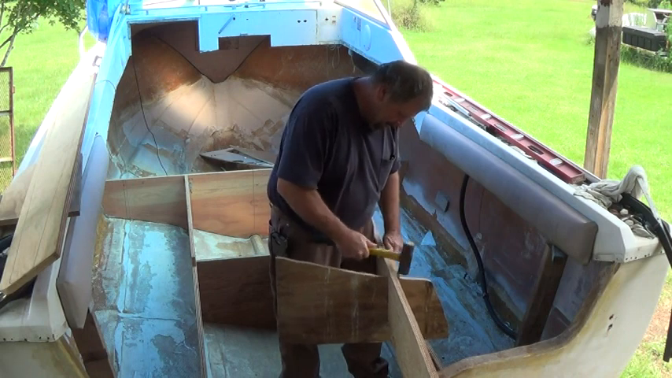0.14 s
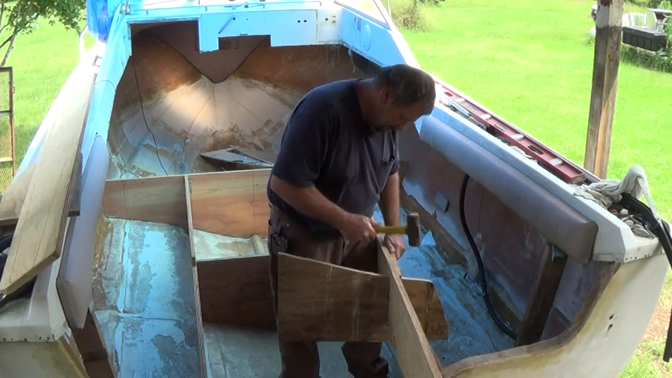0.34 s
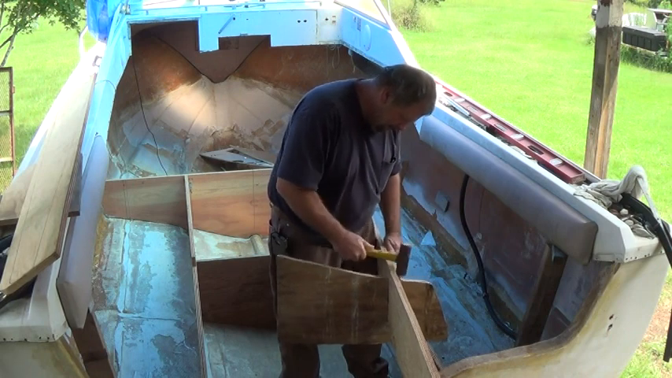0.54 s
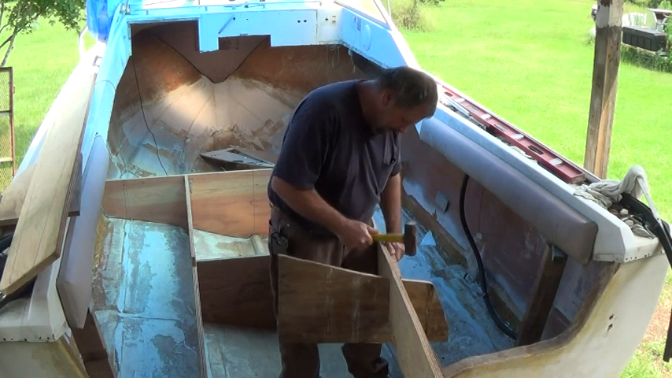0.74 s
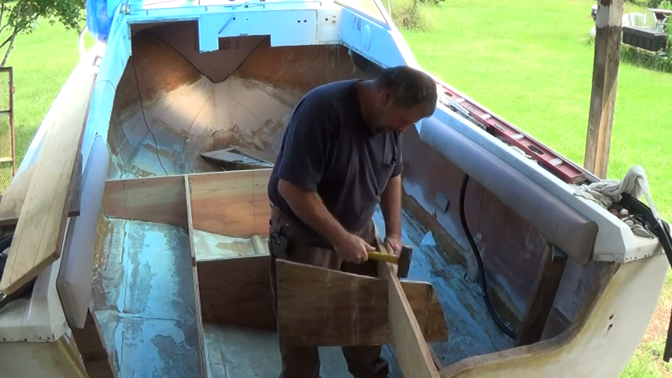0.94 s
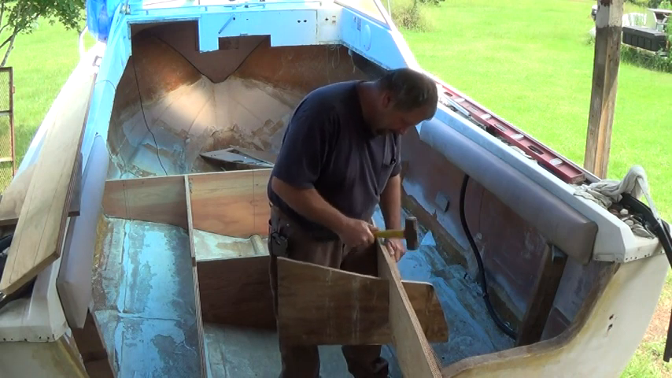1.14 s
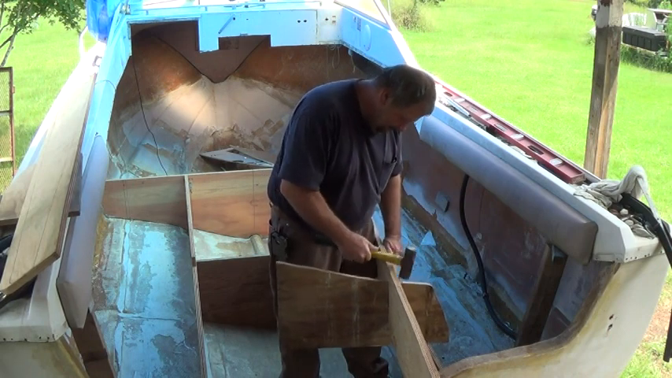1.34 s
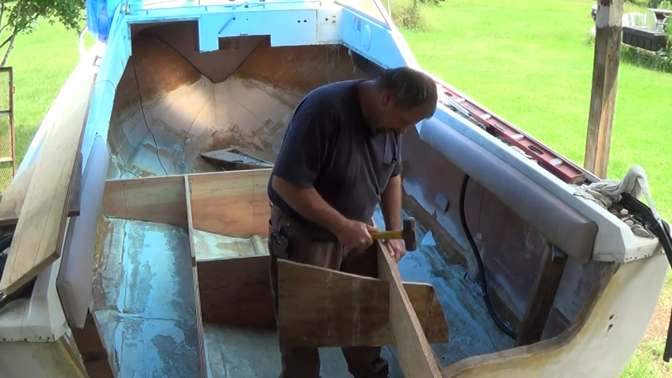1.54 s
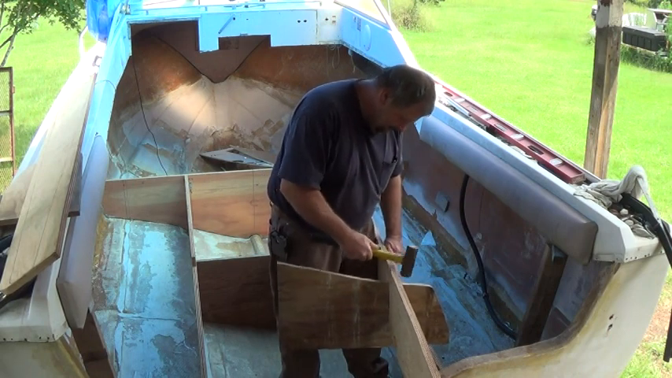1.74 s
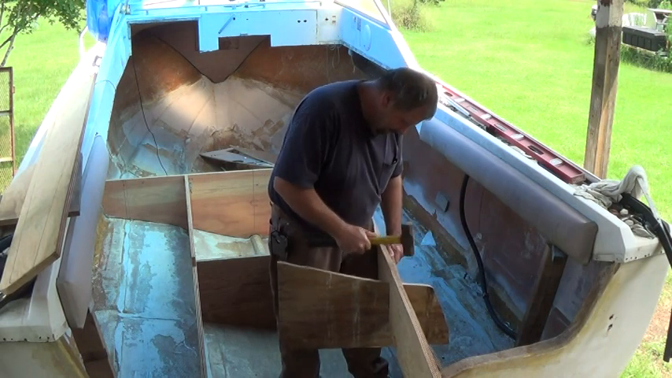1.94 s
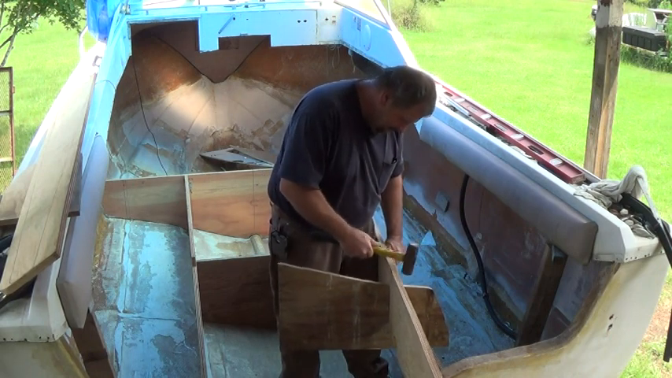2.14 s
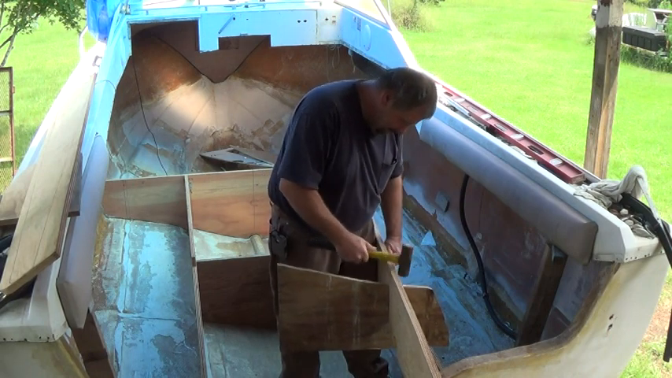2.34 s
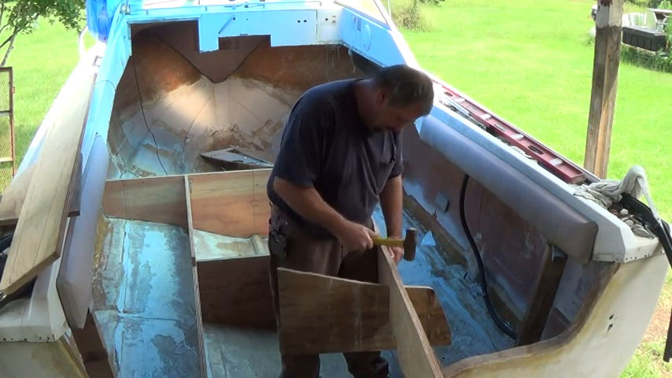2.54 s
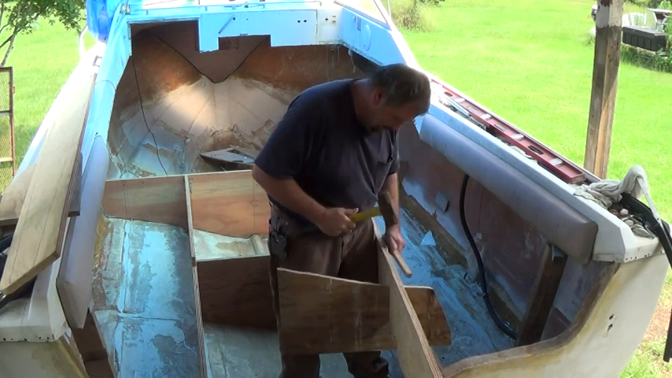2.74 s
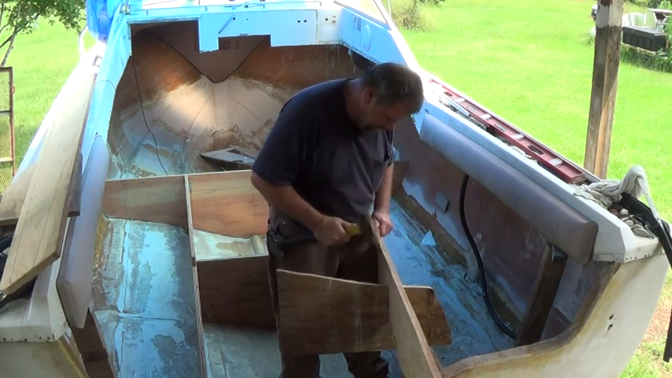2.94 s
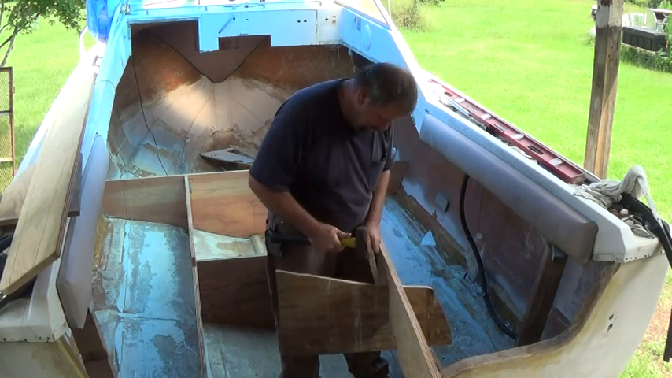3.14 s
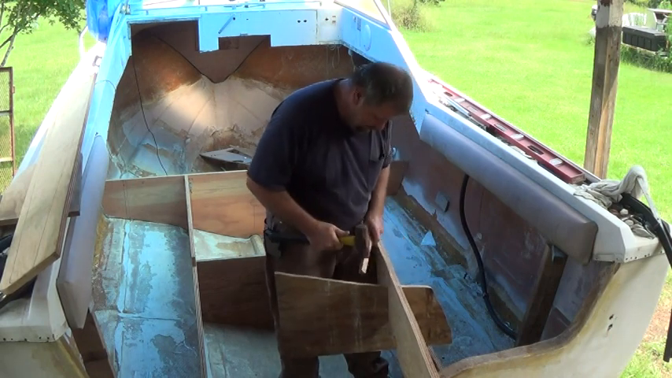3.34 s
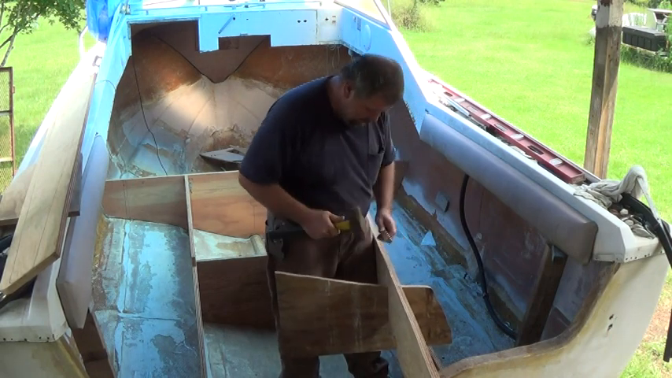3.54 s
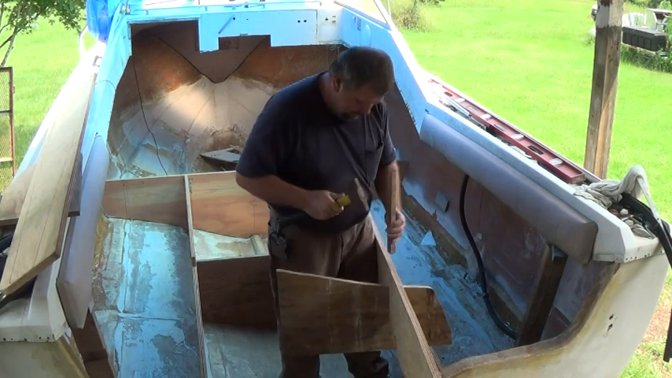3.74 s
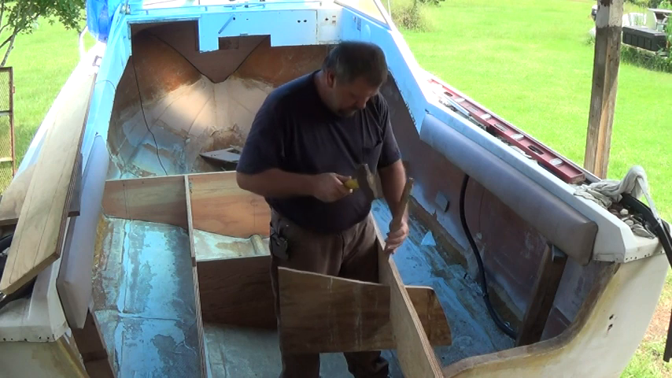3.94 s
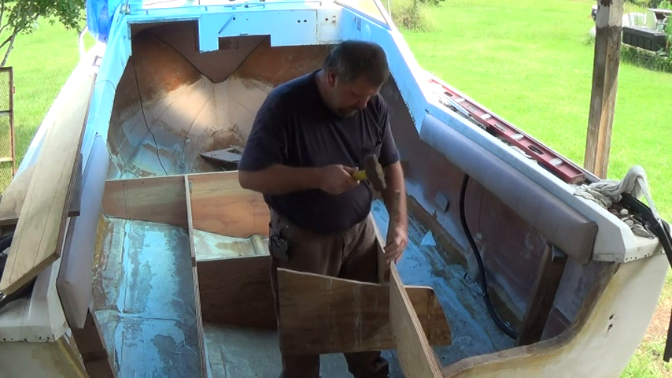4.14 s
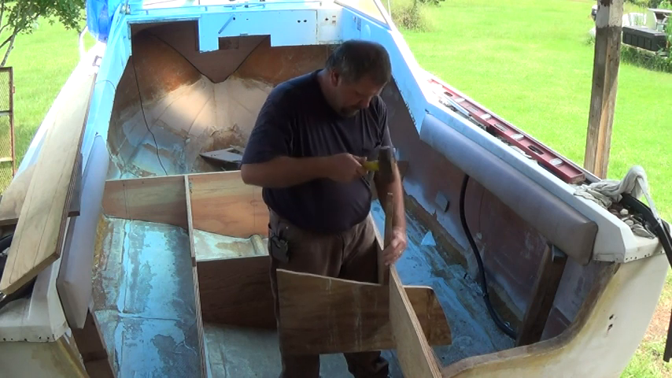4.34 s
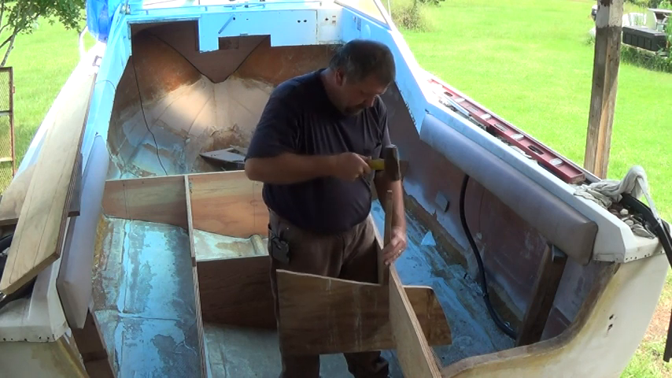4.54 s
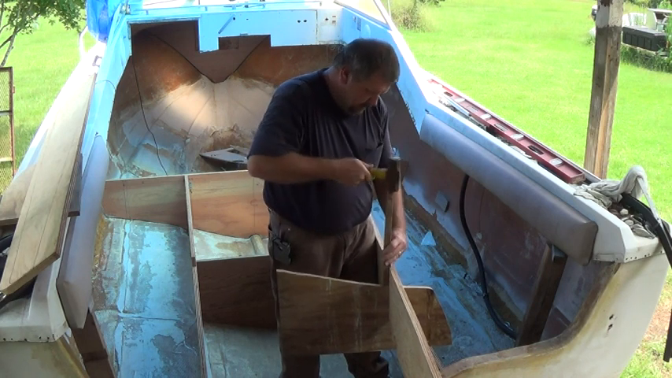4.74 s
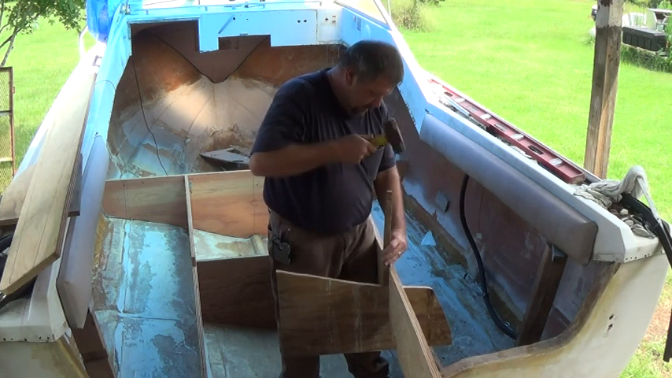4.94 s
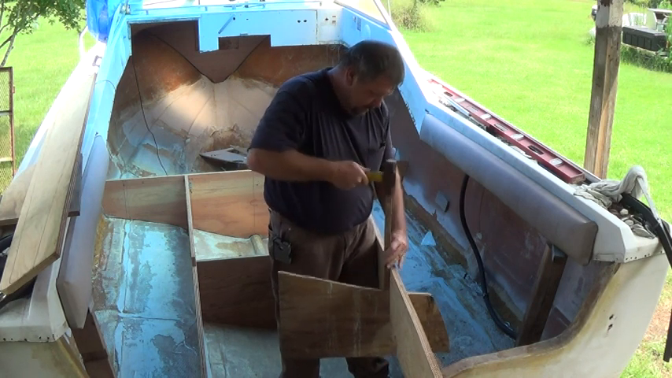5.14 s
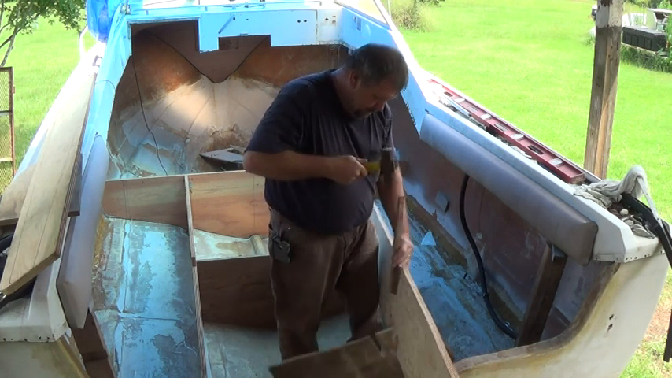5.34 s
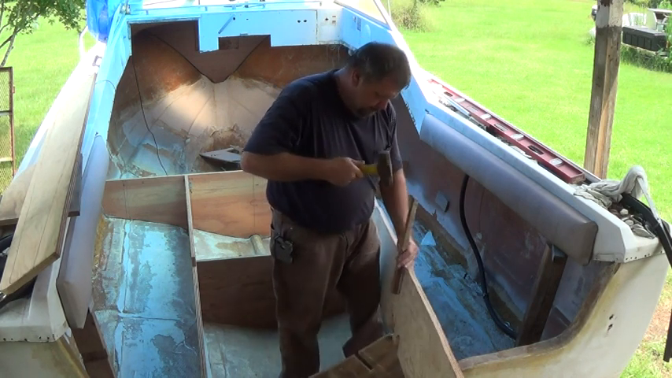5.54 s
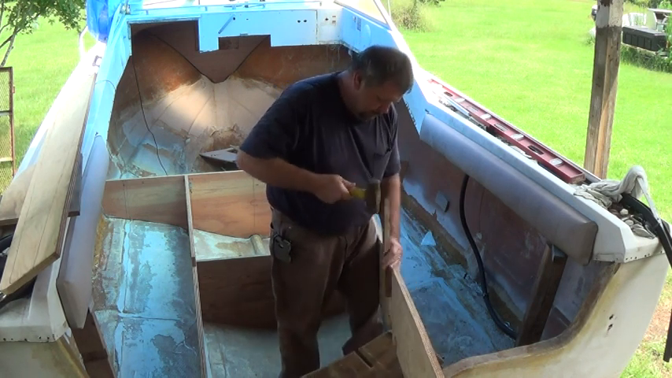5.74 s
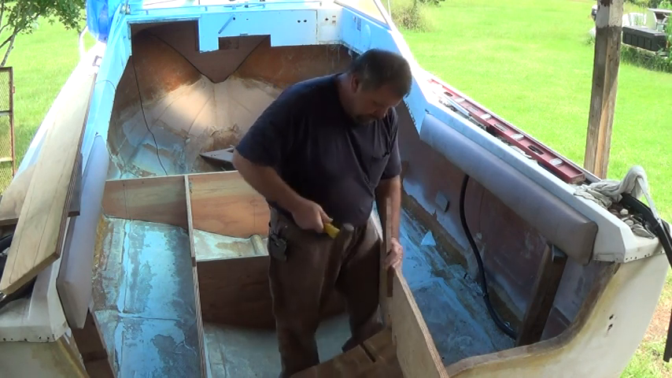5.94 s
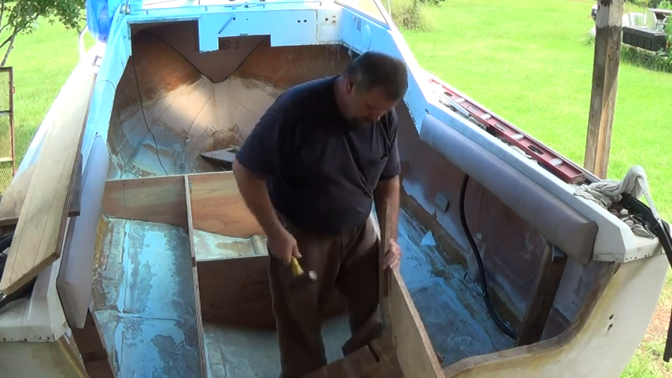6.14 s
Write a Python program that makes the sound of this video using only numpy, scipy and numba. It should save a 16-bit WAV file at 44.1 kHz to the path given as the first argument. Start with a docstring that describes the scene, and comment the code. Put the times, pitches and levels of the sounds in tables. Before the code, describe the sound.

Outdoors under a shed roof, a steel hammer strikes a wedged plywood board in an open boat hull: seven sharp, boomy cracks, most with a brief metallic ring. A quiet spell of light taps and rubbing follows. One more blow frees the board, which clatters and thuds down. Faint insects, distant rumble and hiss continue behind, caught by a small camera microphone that squeezes the loud hits.

```python
"""From the first moment insects sing in the grass over a far rumble and steady hiss. A steel hammer knocks
a plywood bulkhead loose inside an open boat hull under a shed roof: each blow is a burst of dense clatter
plus decaying board and hull modes, and all but the last also ring the tool. Then come light taps, nudges and
rubbing noise. At last the board is struck free, tips, clatters with tones that slide down, and thuds to the
bottom. A small camera's limiter squeezes every blow, and its thin steady whine is added throughout."""
import sys
import numpy as np
from scipy import signal
from scipy.fft import rfft, irfft
from scipy.io import wavfile
from scipy.ndimage import uniform_filter1d
from numba import njit

SR = 44100
rng = np.random.default_rng(int(sys.argv[2]) if len(sys.argv) > 2 else 0)


def decibels_to_gain(level_db):
    """Convert a level in decibels to a linear amplitude gain (20 dB per decade)."""
    exponent = np.asarray(level_db, float) / 20
    return 10 ** exponent


def put_to_file(sound):
    """Save the sound as 16-bit audio at rate SR, in the file named by the first command-line argument."""
    columns = np.atleast_2d(sound).T  # one column per channel
    safe = np.clip(columns, -1, 1)
    whole_steps = np.round(safe * 32767)
    wavfile.write(sys.argv[1], SR, whole_steps.astype(np.int16))


N = 272979  # length in samples
HISS_TOP_HZ = 15780  # air and rubbing noise stop here
BOTH = np.array([[1], [-1]])  # opposite signs for left and right


def read(points, hz):
    """Interpolation on a logarithmic frequency axis, as hearing spaces pitch."""
    f, value = np.transpose(points)
    return np.interp(np.log(hz + 1), np.log(f + 1), value)


def evened(x):
    """Normalization to an rms of 1."""
    return x / np.sqrt(np.mean(x ** 2) + 1e-20)


def add(mix, s, sound):
    """Superposition: a two-channel sound is summed in at time s."""
    part = mix[:, round(s * SR):][:, :sound.shape[1]]
    part += sound[:, :part.shape[1]]


def fade_end(t, seconds):
    """A linear ramp to zero at the end of a sound."""
    return np.minimum(1, (t[-1] - t) / seconds)


def pair(noise, alike, lean):
    """Partial coherence: two microphone spectra share some noise and lean to one side."""
    a, b = rfft(noise)
    hz = np.fft.rfftfreq(noise.shape[1], 1 / SR)
    same = np.clip(read(alike, hz), 0, 1)
    side = decibels_to_gain(read(lean, hz) / 2)
    left = a * side
    right = (same * a + np.sqrt(1 - same ** 2) * b) / side
    return hz, np.array([left, right])


def wander(rate):
    """Random modulation of rms 1: twelve sines up to rate in Hz, the slower ones stronger."""
    t = np.arange(N) / SR
    sines = [np.sin(2 * np.pi * (f * t + rng.random())) / np.sqrt(f)
             for f in np.geomspace(rate / 12, rate, num=12)]
    return evened(sum(sines))


# Spectrum of far rumble, wind and microphone hiss. Each row: frequency in Hz, relative density in dB per Hz.
AIR_SPECTRUM = [(15, -51), (25, -33), (43, -2), (76, -4), (108, 5.5), (190, -8), (256, -4), (344, -8),
                (734, -15.5), (2410, -25.5), (3250, -26), (6380, -30.5), (7710, -22), (9070, -25.5),
                (16000, -30.5)]
# Coherence of the two channels. Each row: frequency in Hz, left-right likeness from 0 to 1.
AIR_LIKENESS = [(60, 0.95), (240, 1), (950, 0.45), (3770, 0.54), (15000, 1)]
# Balance of the air. Each row: frequency in Hz, left minus right in dB.
AIR_BALANCE = [(60, 1), (240, -2.3), (950, 2), (3770, 0.5), (15000, -3.5)]
# Swell of far traffic and wind. Each row: time in seconds, level in dB.
RUMBLE_SWELL = [(0, -45.5), (.6, -51.5), (2.9, -50), (3.2, -54), (3.9, -54), (4.5, -50), (6.19, -56)]
HISS_DB = -53


def air():
    """Filtered noise: a far rumble that swells and fades over steady hiss, crossing over near 500 Hz."""
    hz, noise = pair(rng.standard_normal((2, N)), AIR_LIKENESS, AIR_BALANCE)
    noise = noise * decibels_to_gain(read(AIR_SPECTRUM, hz)) * (hz < HISS_TOP_HZ)
    low = 1 / (1 + (hz / 500) ** 2)
    swell = decibels_to_gain(np.interp(np.arange(N) / SR, *np.transpose(RUMBLE_SWELL)))
    rumble = swell * evened(irfft(noise * low, N))
    hiss = decibels_to_gain(HISS_DB) * evened(irfft(noise * (1 - low), N))
    return rumble + hiss


# The singing bands. Each row: centre in Hz, width at half amplitude in Hz, level in dB before the wander.
INSECT_BANDS = [(7750, 310, -59.5), (7560, 210, -67), (8130, 170, -69)]


def insects():
    """Amplitude-modulated narrow-band noise: a rasping chorus whose bands wander in level."""
    likeness, balance = [(7000, 0.17), (9000, 0.43)], [(7000, 0.28), (9000, 0.2)]
    hz, noise = pair(rng.standard_normal((2, N)), likeness, balance)
    chorus = 0
    for f, width, db in INSECT_BANDS:
        band = evened(irfft(noise / (1 + (2 * (hz - f) / width) ** 2), N))
        chorus = chorus + decibels_to_gain(db + 2.8 * wander(14.0)) * band  # wander up to 14 Hz, 2.8 dB rms
    return chorus


# Faint dry ticks in the treble. Each row: start in seconds, level in dB.
TICK_TIMES = [(4.1764, -48), (4.5286, -52), (4.7436, -45), (5.294, -33.5), (5.4096, -42), (5.6456, -47),
              (5.7917, -46)]
TICK_T60_S, TICK_LOW_HZ, TICK_HIGH_HZ = 0.061, 8000, 13000


def tick(db):
    """Exponential decay of band-passed noise: a short dry tick."""
    t = np.arange(SR // 10) / SR
    band = signal.butter(2, [TICK_LOW_HZ, TICK_HIGH_HZ], "bandpass", fs=SR, output="sos")
    hiss = signal.sosfilt(band, rng.standard_normal(len(t)))
    return decibels_to_gain(db - 60 * t / TICK_T60_S) * evened(hiss) * np.ones((2, 1))


# Balance of the work sounds. Each row: frequency in Hz, left minus right in dB.
BALANCE = [(60, 0), (150, -7), (380, -5), (950, -0.5), (2380, 0.5), (5980, 0), (15000, -1.5)]
# Coherence of the work sounds. Each row: frequency in Hz, left-right likeness from 0 to 1.
LIKENESS = [(60, 0.5), (180, 0.84), (400, 0.99), (900, 0.9), (3000, 0.81), (7000, 0.92), (15000, 1)]
# Spectrum of rubbing. Each row: frequency in Hz, relative density in dB per Hz.
RUB_SPECTRUM = [(59, -21), (100, 1), (264, -23), (438, -0.5), (614, -9), (712, -5), (2320, -10.5),
                (9740, -30.5), (15500, -43)]
# Wood and boots sliding on the hull. Each row: start in seconds, rise in seconds, peak in dB,
# fade in dB per second, treble lift in dB.
RUBS = [(3.12, 0.049, -47, 53, 14), (4.1, 0.017, -46.5, 60, 7), (4.26, 0.078, -52.5, 120, 6),
        (5.02, 0.046, -54.5, 45, 10), (5.22, 0.0078, -18.5, 87, 2.5), (6.055, 0.066, -38.5, 182, 14)]
LIFT_HZ, LIFT_OCTAVES = 10000, 0.94  # centre and spread of the treble lift


def slide(rise, db, fade_db, lift_db):
    """Friction noise: a gritty hiss of many small catches that swells with the pressure and fades."""
    t = np.arange(SR // 2) / SR
    catches = uniform_filter1d(rng.standard_normal(len(t)), size=60) * np.sqrt(60)
    grit = decibels_to_gain(1.5 * catches)
    hz, noise = pair(grit * rng.standard_normal((2, len(t))), LIKENESS, BALANCE)
    lift = lift_db * np.exp(-(np.log2((hz + 1) / LIFT_HZ) / LIFT_OCTAVES) ** 2)
    spectrum = noise * (hz < HISS_TOP_HZ) * decibels_to_gain(read(RUB_SPECTRUM, hz) + lift)
    hiss = evened(irfft(spectrum, len(t)))
    swell = np.sin(np.pi / 2 * np.minimum(t / rise, 1)) ** 2
    pressure = swell * decibels_to_gain(-fade_db * np.maximum(t - rise, 0))
    return decibels_to_gain(db) * pressure * hiss * fade_end(t, 0.031)


RISE_CYCLES = 4.45  # build-up time constant of wood, in periods


def ring(t, hz, t60, cycles):
    """Resonance envelope: energy builds over a few cycles, then decays by 60 dB in t60 seconds."""
    return (1 - np.exp(-t * hz / cycles)) * decibels_to_gain(-60 * t / t60)


# A woody resonance slides down as the falling board meets the hull. Each row: start in seconds, level in dB,
# first pitch in Hz, final pitch in Hz, t60 in seconds.
PITCH_FALLS = [(5.292, -9.5, 579, 389.4, 0.33), (5.489, -13.5, 807, 238, 0.5)]
GLIDE_S, GLIDE_WIDTH_HZ = 0.02935, 42  # time constant of the fall, bandwidth of the fuzz


def glide(db, from_hz, to_hz, t60):
    """Frequency modulation: a tone, fuzzed by slow noise, whose pitch settles exponentially downwards."""
    t = np.arange(SR // 4) / SR
    pitch = to_hz + (from_hz - to_hz) * np.exp(-t / GLIDE_S)
    tone = np.sin(2 * np.pi * np.cumsum(pitch) / SR)
    r = np.exp(-np.pi * GLIDE_WIDTH_HZ / SR)
    fuzz = 1 + 0.4 * evened(signal.lfilter([1], [1, -r], rng.standard_normal(len(t))))
    level = decibels_to_gain(db + read(BALANCE, to_hz) / 2 * BOTH)
    return level * fuzz * tone * ring(t, from_hz, t60, RISE_CYCLES)


# Modes of the steel tool. Each row: multiple of the pitch, relative level in dB, t60 in seconds.
TOOL_MODES = [(0.999, -1.5, 0.051), (1.014, -15, .2), (1.19, -4, 0.02), (1.95, -19, 0.023)]
# The tool strikes or is bumped. Each row: start in seconds, level in dB, pitch in Hz.
TOOL_STRIKES = [(.192, 1.5, 2200), (.625, -8, 1855), (1.008, -1.5, 2043), (1.38, -5.5, 1963),
                (1.739, -6, 1986), (2.097, -3.5, 2090), (2.852, -49, 1950), (3.463, -20.5, 2050),
                (5.22, -14, 1990), (5.793, -32, 1970)]
TOOL_RISE_CYCLES = 7.


def tool(db, hz):
    """Beating of close modes: the short ring of hammer and chisel."""
    t = np.arange(SR // 4) / SR
    total = 0
    for multiple, mode_db, t60 in TOOL_MODES:
        f = hz * multiple
        tone = np.sin(2 * np.pi * (f * t + rng.random()))
        total = total + decibels_to_gain(mode_db) * tone * ring(t, f, t60, TOOL_RISE_CYCLES)
    return decibels_to_gain(db) * total * decibels_to_gain(0.3 * BOTH)


def mode(t, hz, t60, cycles, start):
    """Modal vibration heard by both microphones; short waves vary more with the spot struck."""
    spot, drift, shift, lead = rng.standard_normal(4) * min(hz / 600, 1)
    phase = 2 * np.pi * hz * (1 + 0.01175 * drift) * t + start + 2 * shift + 0.72 * lead * BOTH
    level = decibels_to_gain(3.5 * spot + read(BALANCE, hz) / 2 * BOTH)
    return level * np.sin(phase) * ring(t, hz, t60, cycles)


# Modes of board and hull. Each row: nominal frequency in Hz, level in dB before the drive,
# t60 in seconds before the lasting factor.
HULL_MODES = [(89.9, 0.5, 0.19), (135.24, -8.5, 0.65), (150.1, -9.5, 0.45), (162.25, 2.5, 0.45),
              (224, -28, 0.19), (254.3, -13, 0.59), (280.3, -8, 0.4), (339.4, -8, 0.25), (373, -1.5, 0.36),
              (423, -8.5, 0.42), (472.3, -6, 0.3), (553, -10, 0.39), (625, 0.5, 0.14), (744.5, -6.5, 0.28),
              (899, -9.5, 0.36), (989, -24, 0.42), (1216, -7, 0.29), (1185, -24, 0.43), (1230, -27, 0.073),
              (1425, -15, 0.16), (1517, -22, 0.41), (1680, -25, 0.51), (2520, -4, 0.037), (3180, -11, 0.17)]
# Dense clatter thrown about hull and shed. Each row: band centre in Hz, level in dB before the drive,
# t60 in seconds before the lasting factor.
CLATTER_BANDS = [(53.4, -35, 0.98), (116, -6.5, 0.47), (216, -6.5, 0.46), (379, -5, 0.4), (628, -4.5, 0.34),
                 (1180, -11, 0.32), (1600, -5.5, 0.33), (2565, -7.5, 0.29), (4120, -11, 0.28),
                 (5390, -14.5, 0.25), (7100, -14.5, 0.27), (11440, -1.5, 0.22), (15400, -36, 0.033)]
BODY_HZ, BODY_OCTAVES = 513, 0.82  # where the board speaks most at the briefest contact, and its spread


def drive(f, contact_ms, boom_db, body_db):
    """Contact-time low-pass: longer contact drives less treble; the spot sets how hull and board shake."""
    body_hz = BODY_HZ / (1 + .55 * contact_ms)  # a flat, soft landing bends the whole board
    if f < 230:
        shaken_db = boom_db
    else:
        shaken_db = body_db * np.exp(-(np.log2(f / body_hz) / BODY_OCTAVES) ** 2)
    return decibels_to_gain(shaken_db) / (1 + (2 * f * contact_ms / 1000) ** 4)


def knock(db, contact_ms, boom_db, body_db, lasting):
    """Impact excitation: one blow on wood sounds dense clatter by band and the modes of board and hull."""
    t = np.arange(SR // 2) / SR
    hz, noise = pair(rng.standard_normal((2, len(t))), LIKENESS, BALANCE)
    centres = np.log(np.transpose(CLATTER_BANDS)[0])
    out = np.zeros((2, len(t)))
    for k, (f, level_db, t60) in enumerate(CLATTER_BANDS):
        # overlapping bands whose powers sum to one
        band = np.sqrt(np.interp(np.log(hz + 1), centres, np.arange(len(centres)) == k))
        clatter = evened(irfft(noise * band, len(t))) * ring(t, f, t60 * lasting, RISE_CYCLES)
        out += decibels_to_gain(level_db) * drive(f, contact_ms, boom_db, body_db) * clatter
    for k, (f, level_db, t60) in enumerate(HULL_MODES):
        # neighbours start opposed, so the boom swells late and beats
        tone = mode(t, f, t60 * lasting, RISE_CYCLES, np.pi * k)
        out += decibels_to_gain(level_db) * drive(f, contact_ms, boom_db, body_db) * tone
    return decibels_to_gain(db) * out * fade_end(t, 0.035)


# Light taps of the tool on an edge. Each row: start in seconds, strength in dB.
EDGE_TAPS = [(2.851, -46), (3.461, -31), (5.792, -39.5)]


def tap(db):
    """Weak excitation: a light touch barely moves the hull and rings briefly."""
    return knock(db, contact_ms=0.17, boom_db=-22, body_db=-7, lasting=0.52)


# The loosened board is nudged, struck free, tips and lands. Each row: start in seconds, strength in dB,
# contact time in ms, hull boom in dB, board body in dB.
BOARD_BUMPS = [(3.18, -40.5, 1.7, -5, 9), (4.114, -25, 0.66, -11.5, -12), (4.37, -41.5, 0.91, -0.5, -3),
               (4.744, -34, 0.065, 10.5, 6), (5.219, -14, 0.059, -3, -2.5), (5.292, -11.5, 0.21, -8, -2.5),
               (5.331, -18.5, 0.22, 2, 6.5), (5.385, -27, 0.38, 10.5, -9), (5.489, -24, 0.066, 16, 17),
               (5.507, -14, 1.15, 7.5, 17.5), (5.645, -37.5, 0.14, 0, 7), (5.657, -14.5, 1.42, 3, 5),
               (6.15, -45.5, 2.1, 14, 7)]


def bump(db, contact_ms, boom_db, body_db):
    """Impact of a free plate: the loose board meets hull, hand or tool and rings shorter than when wedged."""
    return knock(db, contact_ms, boom_db, body_db, lasting=0.87)


# Hammer blows on the wedged board. Each row: start in seconds, strength in dB, contact time in ms,
# hull boom in dB, board body in dB.
HAMMER_BLOWS = [(.191, -7, 0.066, -2, -2.5), (.624, -10, .062, 1.5, 3), (1.005, -12.5, 0.073, 5, 1),
                (1.376, -14.5, 0.072, 8.5, 7), (1.738, -11.5, 0.063, 4, 1.5), (2.097, -11.5, 0.058, 0, 0.5),
                (2.4455, -14.5, .046, 7.5, 10.5)]


def blow(db, contact_ms, boom_db, body_db):
    """Hard impact: a steel face on wedged plywood, whose brief contact excites the treble."""
    return knock(db, contact_ms, boom_db, body_db, lasting=0.93)


def scene():
    """Superposition of ticks, rubbing, falling tones, tool, taps, bumps and blows over air and insects."""
    mix = air() + insects()
    sources = [(TICK_TIMES, tick), (RUBS, slide), (PITCH_FALLS, glide), (TOOL_STRIKES, tool),
               (EDGE_TAPS, tap), (BOARD_BUMPS, bump), (HAMMER_BLOWS, blow)]
    for table, source in sources:
        for s, *row in table:
            add(mix, s, source(*row))
    return mix


def whine():
    """Pure tone: the camera's thin, steady whine at 15734.5 Hz."""
    return decibels_to_gain(-64) * np.sin(2 * np.pi * 15734.5 * np.arange(N) / SR)


@njit
def follow(over_db, fall, rise):
    """Exponential smoothing of the excess level with separate rates, per sample, for rise and fall."""
    out, held = np.empty_like(over_db), 0.
    for n in range(len(over_db)):
        held += (rise if over_db[n] > held else fall) * (over_db[n] - held)
        out[n] = held
    return out


def limiter(dry):
    """Gain reduction shared by both channels, with a quick and a slow recovery."""
    power = uniform_filter1d((dry ** 2).max(0), size=121)  # mean over a few milliseconds
    over_db = np.maximum(10 * np.log10(abs(power) + 1e-12) + 13, 0)  # excess over -13 dB
    quick_db = follow(over_db, fall=1 / (0.0013 * SR), rise=1 / (0.00059 * SR))  # time constants in s
    slow_db = follow(quick_db, fall=1 / (.55 * SR), rise=1 / (.4 * SR))
    return dry * decibels_to_gain(-.78 * quick_db - .9 * slow_db)


def low_pass(x):
    """Removes everything above the highest recorded frequency."""
    return signal.sosfilt(signal.butter(12, 17150, fs=SR, output="sos"), x)


def record(dry):
    """Signal chain of the camera: the limited scene plus the unlimited whine."""
    mix = limiter(dry) + whine()
    return low_pass(mix)


dry = scene()
out = record(dry)
put_to_file(out)
```